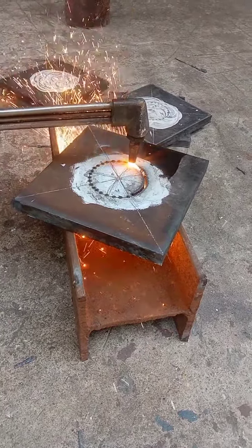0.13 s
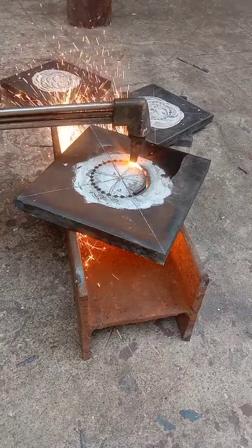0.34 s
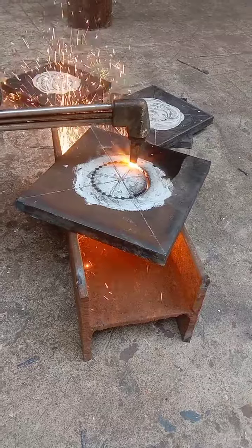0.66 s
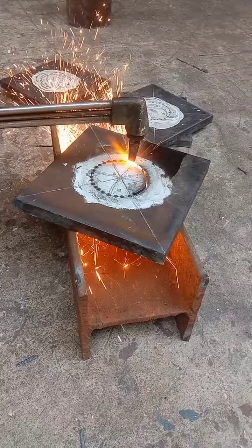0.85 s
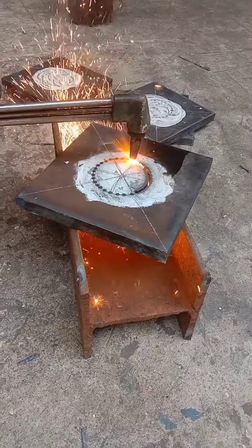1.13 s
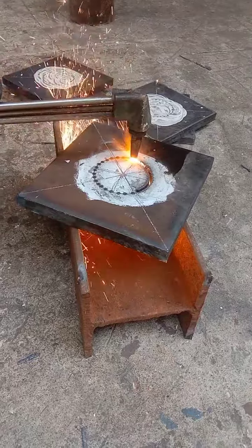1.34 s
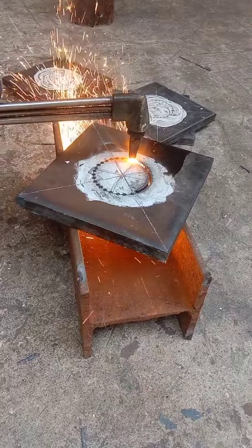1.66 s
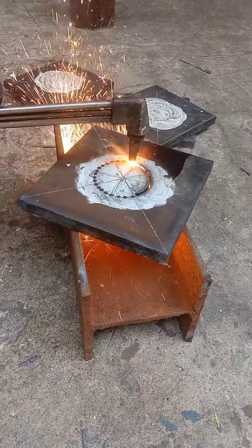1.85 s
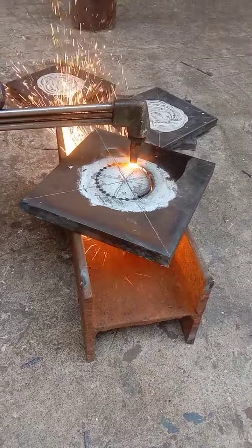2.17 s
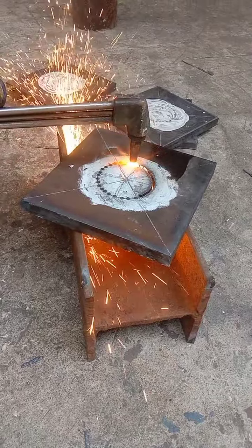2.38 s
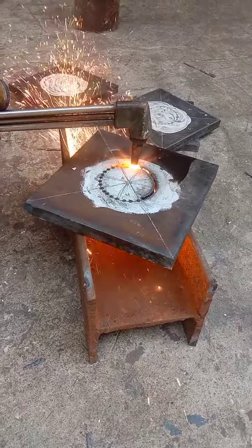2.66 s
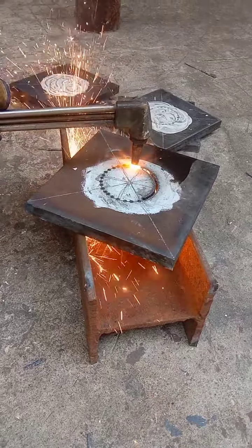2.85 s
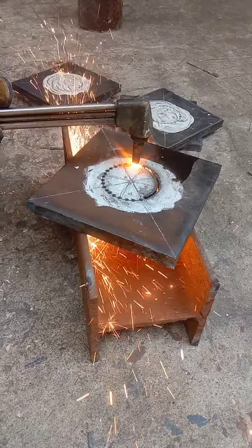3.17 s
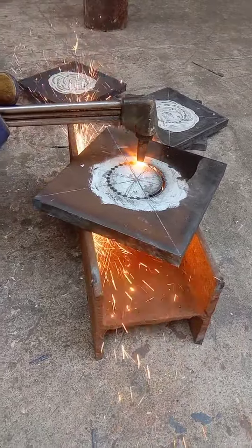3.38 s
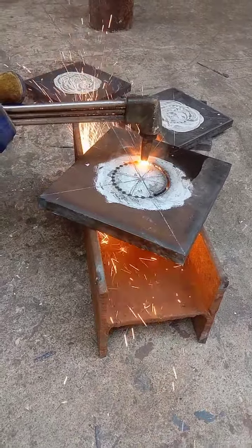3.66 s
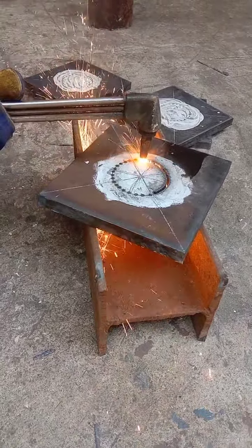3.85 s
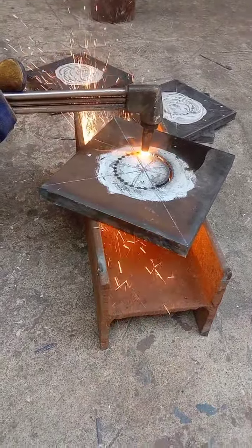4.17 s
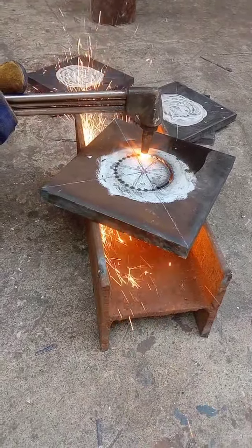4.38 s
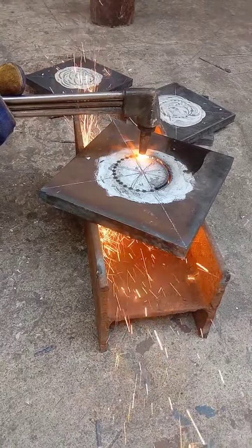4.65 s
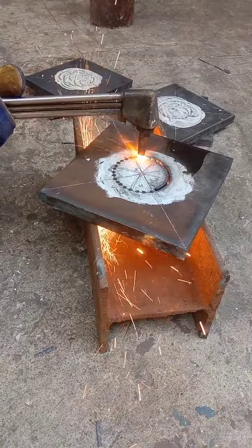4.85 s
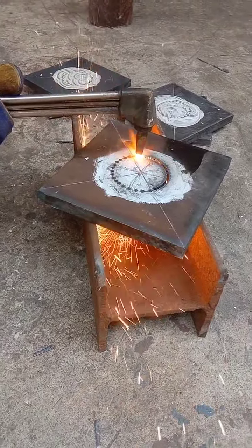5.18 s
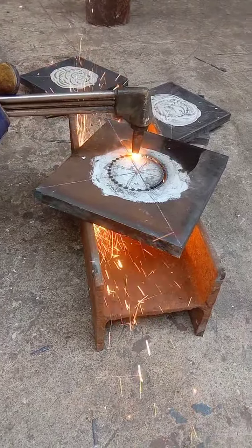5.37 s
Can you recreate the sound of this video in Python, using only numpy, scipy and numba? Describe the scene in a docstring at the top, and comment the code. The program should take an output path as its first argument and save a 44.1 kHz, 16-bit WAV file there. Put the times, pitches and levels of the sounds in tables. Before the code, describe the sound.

A cutting torch is already at full blast at 0 s and continues unbroken to about 5.5 s. The sound is a dense, bright hiss, strongest in the highs, with a broad breathy whistle around 5 kHz that is more turbulent air than clear tone. Fine grainy sizzle from slag and sparks runs beneath, along with a quieter mid-range roar and very soft, low flame puffs. The whistle is strongest at first, dips near 0.4 s, then holds fairly steady. Tiny dull spits crack near 0.2, 1.3 and 2.0 s. Around 2.4-2.5 s the whistle drops, several spits bunch together, and a short throaty sputter builds and abruptly stops. More spits follow near 2.8, 2.9 and 3.2 s. Afterwards the hiss is sharper and the whistle weaker, swelling and sagging unevenly; the sizzle rises briefly near 5.1 s. Close, dry, the same in both channels, cut off while still blowing.

```python
"""Oxy-fuel torch cutting steel plate

A torch cuts a round pattern in a thick plate on a steel beam. Its oxygen jet is shaped broadband noise,
with a high hiss at the nozzle; noise through moving resonances is the whistle of the narrow cut, which
shifts as the hand moves. Slag sprays out below as grainy noise, spits in short bursts and sputters once.
The flame flutters low in swelling puffs of noise. Both channels carry the same sound."""
import sys
import numpy as np
from scipy import signal
from scipy.fft import rfft, irfft, next_fast_len
from scipy.io import wavfile
from numba import njit

SR = 44100
rng = np.random.default_rng(int(sys.argv[2]) if len(sys.argv) > 2 else 0)


def waveform_to_disk(signal):
    """Save audio, clipped to [-1, 1], as 16-bit WAV at the path in sys.argv[1]."""
    frames = np.transpose(np.atleast_2d(signal))
    scaled = np.clip(frames, -1, 1) * 32767
    samples = np.round(scaled).astype(np.int16)
    wavfile.write(sys.argv[1], SR, samples)


N = 243412  # length in samples


def from_db(db):
    """Decibels to amplitude gain."""
    return 10 ** (np.asarray(db) / 20)


def rms_one(x):
    """Scale to unit power."""
    return x / np.sqrt(np.mean(x ** 2) + 1e-20)


def noise():
    """White noise, the raw turbulence."""
    return rng.standard_normal(N)


def in_time(rows):
    """Draw each column of a breakpoint table as a curve over every sample."""
    start_s, *columns = np.transpose(rows)
    return [np.interp(np.arange(N) / SR, start_s, column) for column in columns]


def swell(middle_s, length_s):
    """A smooth bell of height 1."""
    return np.exp(-2 * ((np.arange(N) / SR - middle_s) / length_s) ** 2)


def drift(rate_hz):
    """Smooth random wander of spread 1: noise low-passed near rate_hz."""
    step = 40  # samples between the computed points
    r = np.exp(-2 * np.pi * rate_hz * step / SR)
    slow = signal.lfilter([1], [1, -2 * r, r * r], rng.standard_normal(N // step + 2002))
    slow = slow[2000:]  # drop the filter's start-up
    return np.interp(np.arange(N) / step, np.arange(len(slow)), rms_one(slow))


def coloured(x, spectrum):
    """Give a steady white excitation a spectrum; rms 1."""
    pitch_hz, level_db = np.transpose(spectrum)
    size = next_fast_len(N)
    bins_hz = np.maximum(np.arange(size // 2 + 1) * SR / size, 1)
    gain = from_db(np.interp(np.log(bins_hz), np.log(pitch_hz), level_db))
    return rms_one(irfft(rfft(x, size) * gain, size)[:N])


def grains(per_s, spread_db):
    """Random clicks, many small and a few large; rms 1."""
    sizes = from_db(spread_db * np.minimum(rng.exponential(1, N), 5)) * rng.choice([-1, 1], N)
    return rms_one(sizes * (rng.random(N) < per_s / SR))


@njit
def resonate(x, hz, r):
    """Two-pole resonance with a moving centre and pole radius r."""
    y = np.zeros(len(x))
    for i in range(2, len(x)):
        drive = (1 - r * r) / 2 * (x[i] - x[i - 2])
        y[i] = drive + 2 * r * np.cos(2 * np.pi * hz[i] / SR) * y[i - 1] - r * r * y[i - 2]
    return y


def blown(hz, width_hz):
    """Turbulence through the same resonance twice, for steep sides; rms 1."""
    centre = hz * np.ones(N)
    r = np.exp(-np.pi * width_hz / SR)  # width of a single pass
    once = resonate(noise(), centre, r)
    return rms_one(resonate(once, centre, r))


def air_modes(modes, stretch=1, lead_db=0):
    """A group of blown resonances, tuned together, of which the first may take the lead; total power near 1."""
    gains = [from_db(db + (lead_db if k == 0 else 0)) for k, (hz, width_hz, db) in enumerate(modes)]
    total = sum(gain * blown(hz * stretch, width_hz) for gain, (hz, width_hz, db) in zip(gains, modes))
    return total / np.sqrt(sum(gain ** 2 for gain in gains))


def flame():
    """The flame flutters faintly and billows against the plate in low, lumpy puffs, some with a deep boom."""
    # flutter spectrum: pitch_hz, relative level_db
    flutter_spectrum = [(20, -21), (45, -18), (75, -3), (110, -1), (160, -1), (280, 3.5), (450, -4.5),
                        (800, -10), (2000, -25)]
    # larger puffs, ahead of the closing 2 dB lift: middle_s, length_s, level_db, boom against flutter_db
    puffs = [(.105, 0.031, -47, 7), (.56, 0.16, -55.5, 3), (0.875, 0.1, -46, 3), (.97, 0.063, -50, 6),
             (1.37, .08, -55.5, -1), (1.615, .06, -48, 7), (1.996, 0.17, -54, -6), (2.216, 0.091, -54, -7),
             (2.495, 0.25, -50, 0), (2.81, .08, -45, -2), (2.96, .12, -51.5, 8), (3.223, 0.054, -51, 1),
             (3.56, 0.08, -45.5, 2), (3.656, .08, -52, 4), (3.944, .06, -49, 5), (4.02, 0.054, -48, -7),
             (4.17, 0.084, -51.5, -7), (4.32, 0.058, -49, 2), (4.444, 0.054, -50, 6),
             (4.65, 0.055, -49, -3), (5.043, .05, -50, -1), (5.27, 0.089, -50.5, -3),
             (5.503, 0.081, -51, 4)]
    start_db, growth_db_per_s, boom_below_hz = -66.5, 1.57, 187
    faint = from_db(start_db + growth_db_per_s * np.arange(N) / SR + 3.5 * drift(10))
    billow = coloured(noise(), flutter_spectrum)
    out = 0
    # half of the boom weight lifts the lows, the other half lowers the rest
    for side, sign in (("low", 1), ("high", -1)):
        power = faint ** 2
        for middle_s, length_s, level_db, boom_db in puffs:
            power = power + (from_db(level_db + sign * boom_db / 2) * swell(middle_s, length_s)) ** 2
        split = signal.butter(3, boom_below_hz, side, fs=SR, output="sos")
        out = out + np.sqrt(power) * signal.sosfilt(split, billow)
    return from_db(2.0 + 1.0 * drift(25)) * out


def spits(decay_s, low_hz, high_hz):
    """A blob of slag blocks the cut and is blown clear with a short, dull crack of decaying noise."""
    # spits: start_s, level_db of the burst ahead of the band filter
    spit_times = [(0.241, -28), (1.333, -30), (1.986, -19), (2.468, -15), (2.491, -29), (2.502, -25),
                  (2.512, -16), (2.788, -25), (2.868, -19), (3.245, -16)]
    t, burst = np.arange(N) / SR, np.zeros(N)
    for start_s, level_db in spit_times:
        burst += from_db(level_db) * (t >= start_s) * np.exp(-np.abs(t - start_s) / decay_s)
    band = signal.butter(2, [low_hz, high_hz], "band", fs=SR, output="sos")
    return signal.sosfilt(band, burst * noise())


def sputter():
    """A short, throaty burst of gas through molten slag: it builds up and stops as the cut clears."""
    # sputter spectrum: pitch_hz, relative level_db
    sputter_spectrum = [(50, -25), (120, -9), (210, 1.5), (380, -7), (800, -4), (1600, -8), (2400, -18),
                        (5000, -35)]
    clear_s, build_s, release_s, level_db = 2.518, 0.039, 0.011, -31
    t = np.arange(N) / SR - clear_s
    envelope = np.exp(np.minimum(t / build_s, -t / release_s))
    gas = coloured(noise() + grains(per_s=1100, spread_db=4.5), sputter_spectrum)
    return from_db(level_db) * envelope * gas


def spray(level_db):
    """Gas and sparks leave the underside as a dense, wavering sizzle with one broad resonance."""
    # pitch set by where the slag stream leaves the plate: start_s, pitch_hz, relative share_db
    singing_pitch = [(0, 8840, -5), (2.1, 8720, 0), (2.6, 8280, -3), (3.3, 8100, -1), (3.7, 8600, -3),
                     (4.15, 8550, -7), (4.45, 7950, -2), (5.52, 7860, 2.5)]
    # sizzle spectrum: pitch_hz, relative level_db
    sizzle_spectrum = [(5500, -24), (7500, 0.5), (8800, 5), (10000, 6.5), (11200, -1), (13000, -7),
                       (16000, -25)]
    pitch_hz, share_db = in_time(singing_pitch)
    sparks = from_db(-4) * grains(per_s=5300, spread_db=4.5)
    sizzle = coloured(noise() + sparks, sizzle_spectrum)
    singing = from_db(share_db - 2) * blown(pitch_hz, width_hz=540)
    return from_db(level_db - 1.34 + 1.43 * drift(13)) * (sizzle + singing)


def nozzle(level_db):
    """The finest eddies give an unsteady high hiss; the harder it blows, the more the tip rings."""
    # hiss spectrum: pitch_hz, relative level_db
    hiss_spectrum = [(8000, -37), (10500, -9), (11700, -9), (12200, -4.5), (13000, -4), (13500, -5),
                     (14300, 1.5), (14900, 1), (15400, -3), (16000, -4)]
    # resonances of the tip: pitch_hz, width_hz of a single pass, relative level_db
    tip_modes = [(12480, 500, -12), (15380, 750, 0)]
    # the lower ring of the tip wanders: start_s, pitch_ratio
    tip_bend = [(0, 1.0), (1.6, 0.94), (2.3, 1.04), (3.0, 0.99), (4.1, 1.035), (4.8, 0.95)]
    bend, = in_time(tip_bend)
    hiss = from_db(0.92 * drift(45)) * coloured(noise(), hiss_spectrum)
    tip = sum(from_db(db) * blown(hz * ratio, width_hz)
              for (hz, width_hz, db), ratio in zip(tip_modes, (bend, 1)))
    ringing_db = -4.5 + 0.95 * (level_db - np.mean(level_db)) + 1.3 * drift(45)
    return from_db(level_db + 0.67 * drift(45)) * (hiss + from_db(ringing_db) * tip)


def roar(level_db):
    """Mixing noise of the jet, grainy with droplets; below the plate it rings the hollow or splashes on the beam."""
    # where the jet blows below the plate: start_s, relative hollow_db, relative splash_db on the beam
    underside = [(0, -1, -26), (.8, -3.5, -19), (1.5, -3.5, -19), (2.2, -5, -10.5), (2.55, -16, -8),
                 (2.85, -12, -6), (3.25, -9, -8), (3.7, -4.5, -13), (4.1, -8, -8), (4.7, -7, -10),
                 (5.52, -6, -9)]
    # hollow between plate and beam: pitch_hz, width_hz of a single pass, relative level_db
    hollow_modes = [(688, 55, -4.5), (790, 74, -6.5), (1125, 50, -10), (1327, 42, -9.5), (1535, 80, -9),
                    (1950, 420, 3.5), (2350, 320, -2.5), (2647, 270, 1.5)]
    # mixing noise and beam splash spectra: pitch_hz, relative level_db
    roar_spectrum = [(60, -43), (200, -29), (350, -7), (520, -6.5), (700, -3), (1100, -0.5), (1700, 0.5),
                     (2900, 0), (4000, 2.5), (6000, 3.5), (8000, -10), (11000, -7), (16000, -7)]
    splash_spectrum = [(100, -30), (250, -8.5), (500, -2.5), (750, -0.5), (1100, 2), (1500, 0.5),
                       (2200, -15), (4000, -26)]
    hollow_db, splash_db = in_time(underside)
    droplets = from_db(-8.0) * grains(per_s=3000, spread_db=2.5)
    mixing = from_db(5.5) * coloured(noise() + droplets, roar_spectrum)
    hollow = from_db(hollow_db) * air_modes(hollow_modes)
    splash = from_db(splash_db) * coloured(noise() + grains(per_s=1500, spread_db=4.0), splash_spectrum)
    return (mixing + hollow + splash) * from_db(level_db + 0.81 * drift(24))


def kerf(low_db, main_db, high_db):
    """The jet blows across the cut; its wobble detunes the resonances and trades strength among them."""
    # the shape of the cut tunes its air column: start_s, main resonance pitch_hz ahead of the wobble
    kerf_pitch = [(0, 5250), (1.0, 5270), (2.15, 5340), (2.45, 5140), (2.8, 5220), (3.2, 5100), (3.6, 5340),
                  (4.2, 5290), (5.0, 5290)]
    # air resonances of the cut in three groups: pitch_hz, width_hz of a single pass, relative level_db
    low_modes = [(3389, 415, -0.5), (3710, 250, -10), (4060, 420, -11)]
    main_modes = [(4610, 810, -9.5), (4954, 590, -5), (5340, 374, -2.5), (5727, 630, -5.5),
                  (6320, 280, -12)]
    high_modes = [(6820, 550, 1), (7153, 780, 2)]
    pitch_hz, = in_time(kerf_pitch)
    stretch = pitch_hz / kerf_pitch[0][1] * (1 + 0.0036 * drift(22))
    low_flicker_db, main_flicker_db, high_flicker_db = 0.65 * drift(25), 0.83 * drift(33), 1.1 * drift(32)
    # as the main resonance fails or the high group gains, the jet favours the first high one
    overblow_db = np.mean(main_db) - main_db + high_db - np.mean(high_db)
    low = from_db(low_db + low_flicker_db) * air_modes(low_modes, stretch)
    main = from_db(main_db + 0.45 + main_flicker_db) * air_modes(main_modes, stretch)
    high_ring = air_modes(high_modes, stretch ** 0.33, lead_db=overblow_db)
    high = from_db(high_db + 0.6 + high_flicker_db) * high_ring
    return low + main + high


def off_the_plate(x, width_hz):
    """Direct sound and its reflection off the plate cancel in one band, which moves with the torch."""
    # cancelled band: start_s, pitch_hz, depth (0-1)
    notch = [(0, 11400, 0.3), (1.0, 10700, 0.2), (2.2, 10100, 0.37), (3.0, 10600, 0.27), (3.4, 9790, 0.4),
             (3.55, 9300, 0.66), (4.25, 9200, 0.37), (4.42, 10300, 0.1), (4.65, 11410, 0.44),
             (5.52, 11400, 0)]
    pitch_hz, depth = in_time(notch)
    return x - np.clip(depth, 0, 1) * resonate(x, pitch_hz, np.exp(-np.pi * width_hz / SR))


def scene():
    """The low resonance follows the roar; all jet sounds surge with the gas flow, beside flame and slag."""
    # base levels ahead of each source's own trim and flicker: start_s, level_db
    roar_levels = [(0, -35.5), (.24, -33.5), (.5, -34.5), (.92, -34.5), (1.12, -33), (1.7, -33.5),
                   (2.27, -34.5), (2.85, -34), (3.7, -34.5), (5.52, -34.5)]
    main_levels = [(0, -18.5), (.22, -18), (.38, -22), (.6, -19.5), (1.1, -19.5), (1.72, -19),
                   (1.85, -20.3), (2.2, -19.5), (2.48, -26), (2.68, -22), (3.1, -26), (3.57, -22),
                   (3.85, -24), (4.1, -22), (4.27, -25.5), (4.6, -21.5), (5.07, -22), (5.25, -25.5)]  # how strongly the jet blows the main resonance of the cut
    high_levels = [(0, -28), (.5, -28), (1.0, -25.5), (1.5, -25.5), (1.63, -27.5), (2.1, -26), (2.36, -32),
                   (2.5, -26.5), (2.62, -29), (2.85, -25.5), (3.15, -25), (3.6, -27.5), (4.12, -24.5),
                   (4.35, -25), (4.5, -29.5), (4.72, -30.5), (4.93, -26.5), (5.12, -28)]  # high resonance of the cut
    hiss_levels = [(0, -22), (.1, -23), (.25, -26), (.45, -24), (1.05, -24.5), (2.28, -23.5), (2.48, -22),
                   (2.7, -22), (3.07, -21.5), (3.3, -23.5), (3.85, -22.8), (4.75, -24), (5.52, -23.5)]
    spray_levels = [(0, -31.5), (.75, -33.5), (2.0, -32.5), (2.45, -33), (3.08, -30.5), (3.7, -31.5),
                    (4.8, -31.5), (5.08, -28.5), (5.22, -32)]
    roar_db, = in_time(roar_levels)
    main_db, = in_time(main_levels)
    high_db, = in_time(high_levels)
    hiss_db, = in_time(hiss_levels)
    spray_db, = in_time(spray_levels)
    # slag clogs the cut once and smothers the low resonance by up to 5 dB
    clog_db = 5 * swell(middle_s=2.43, length_s=0.18)
    low_db = -28 + 0.96 * (roar_db - np.mean(roar_db)) - clog_db
    jet = roar(roar_db) + kerf(low_db, main_db, high_db) + nozzle(hiss_db) + spray(spray_db)
    surge = from_db(0.25 * drift(21))
    slag = sputter() + from_db(3.0) * spits(decay_s=0.0023, low_hz=447, high_hz=2400)
    torch = surge * off_the_plate(jet, width_hz=1840) + flame() + slag
    return np.array([torch, torch])


def record(dry):
    """A steep low-pass cuts the top above 15.5 kHz."""
    top_cut = signal.ellip(14, .1, 90, 15500, fs=SR, output="sos")
    return signal.sosfilt(top_cut, dry)


dry = scene()
out = record(dry)
waveform_to_disk(out)
```